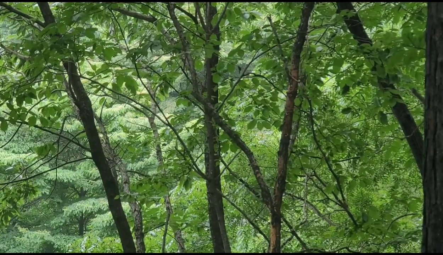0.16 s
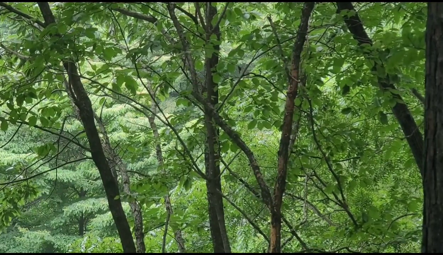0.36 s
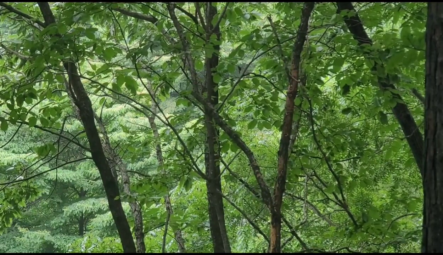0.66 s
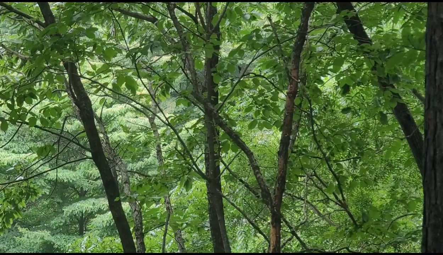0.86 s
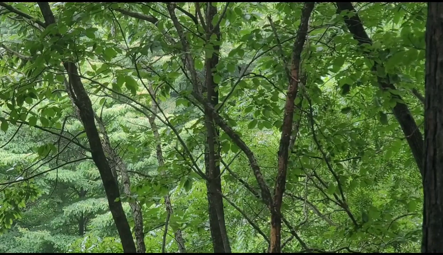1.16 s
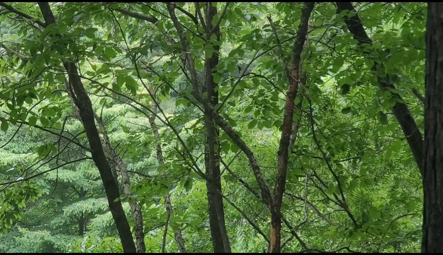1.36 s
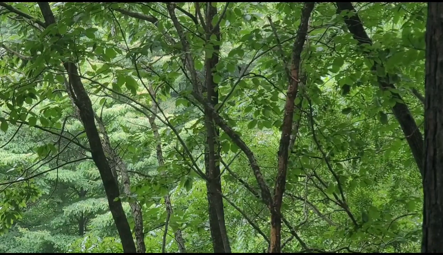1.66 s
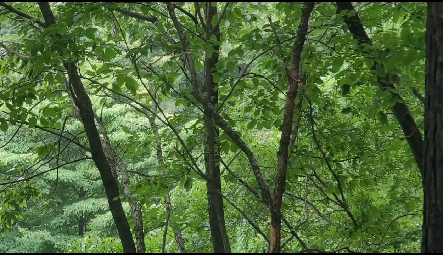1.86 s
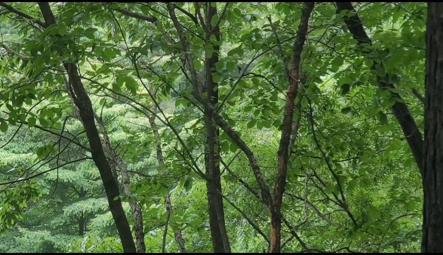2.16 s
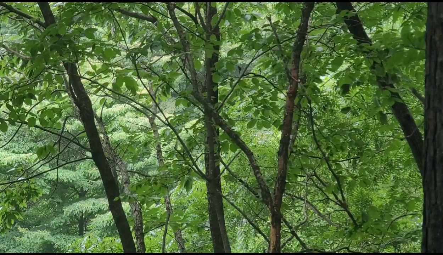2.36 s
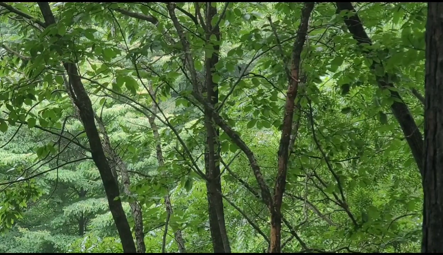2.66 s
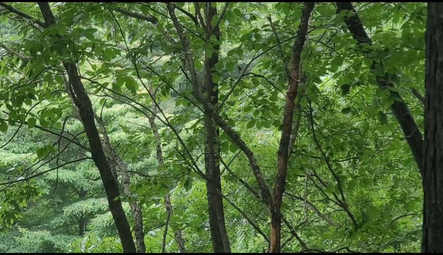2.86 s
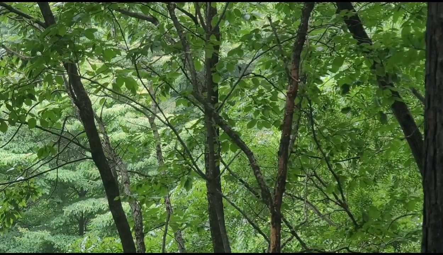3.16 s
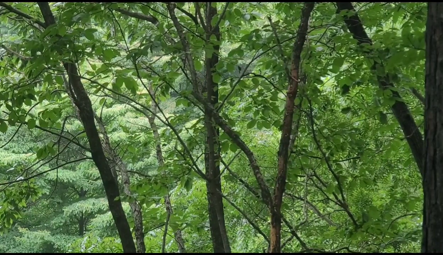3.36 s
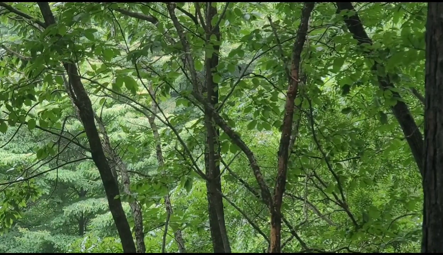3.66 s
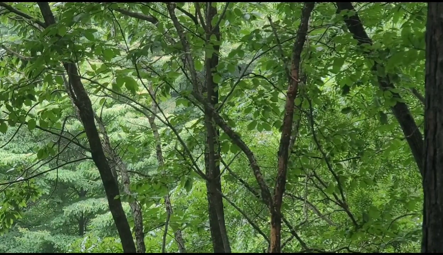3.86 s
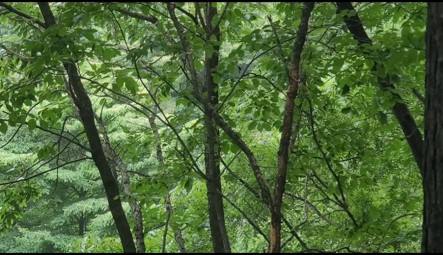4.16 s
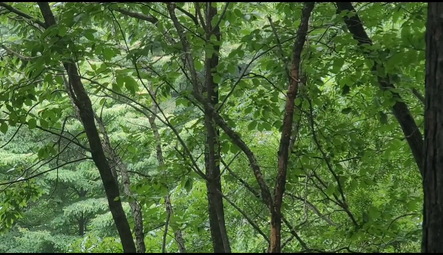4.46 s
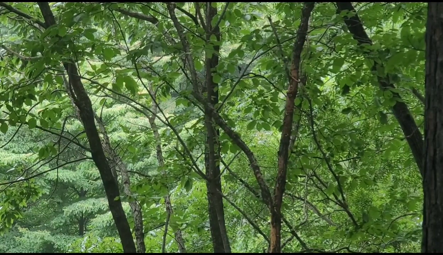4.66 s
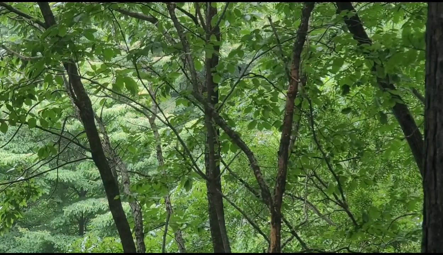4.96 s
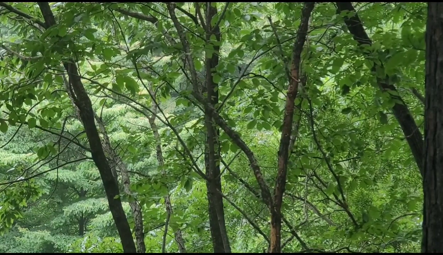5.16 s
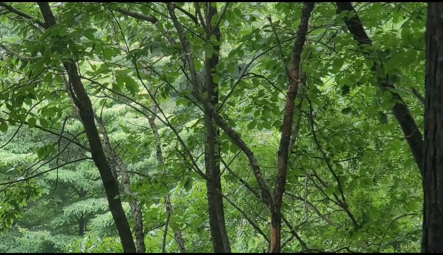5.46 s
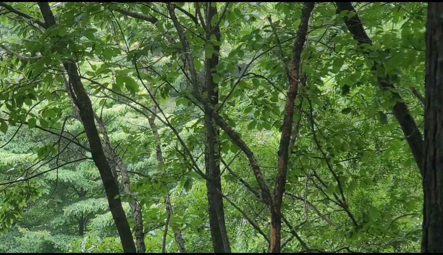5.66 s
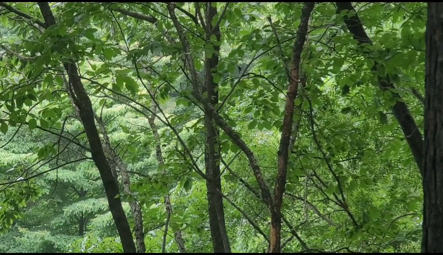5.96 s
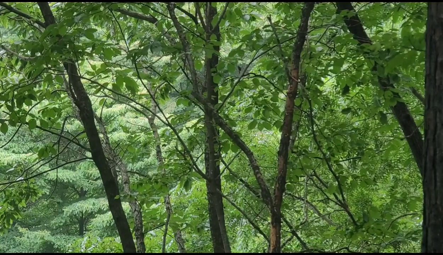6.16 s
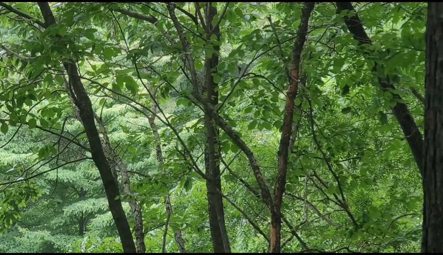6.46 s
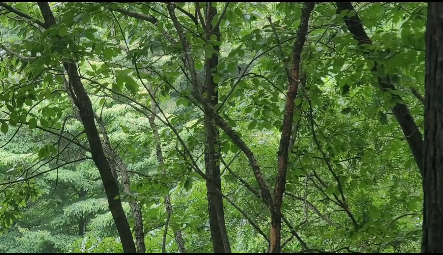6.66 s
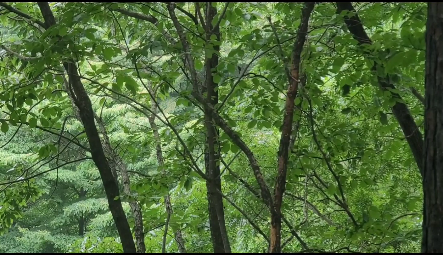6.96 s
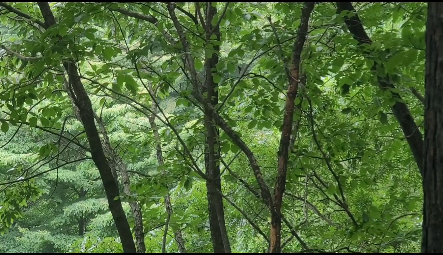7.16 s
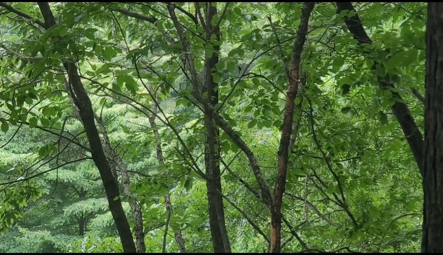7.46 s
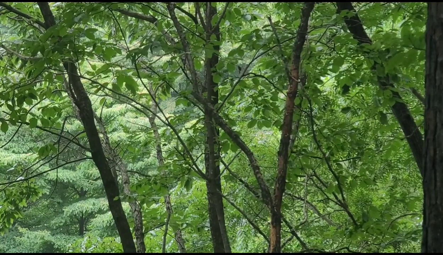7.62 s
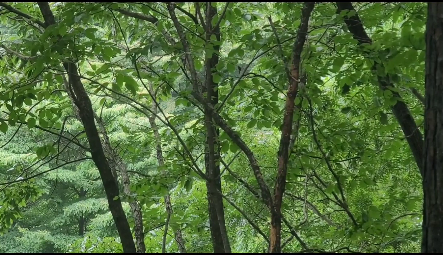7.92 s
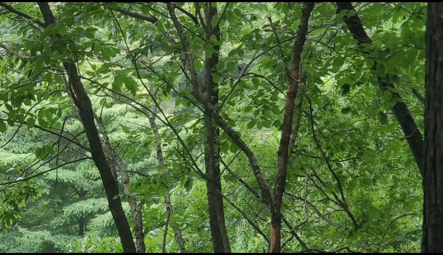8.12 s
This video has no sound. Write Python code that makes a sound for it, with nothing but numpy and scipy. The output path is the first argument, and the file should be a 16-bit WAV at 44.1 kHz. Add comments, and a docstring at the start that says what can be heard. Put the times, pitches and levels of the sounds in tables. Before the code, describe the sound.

Cicadas shrill steadily in a summer wood, with faint bird peeps, light leaf rustles and a few bumps on the microphone.

```python
"""Cicadas shrill in a summer wood: a far chorus near 8 kHz, a nearer group early, a low singer whose
click rate climbs as its pitch sinks, and two high cicadas late, one after the other, the second slower
and fainter. Trains of tymbal clicks ring their hollow abdomens; trunks and leaves scatter the song.
A far bird whistles and something peeps faintly. Close by, leaves rustle and tick, the microphone stand
is bumped, and something scrapes the housing at the end. A hush and a low air rumble lie under it all."""
import sys
import numpy as np
from scipy import signal
from scipy.fft import rfft, irfft
from scipy.io import wavfile
from scipy.ndimage import uniform_filter1d

SR = 44100
rng = np.random.default_rng(int(sys.argv[2]) if len(sys.argv) > 2 else 0)


def persist_wave(psi):
    """Save psi, clipped to +-1, as 16-bit WAV."""
    counts = np.round(np.clip(psi, -1, 1) * 32767).astype(np.int16)
    wavfile.write(sys.argv[1], SR, np.atleast_2d(counts).T)


N = 365588
T = np.arange(N) / SR

# Hush of the wood. Each row: frequency in Hz, relative density in dB.
AIR_SPECTRUM = [(100, -32), (140, -1), (216, -19), (300, -13.5), (400, -14.5), (700, -24), (1000, -23),
                (1500, -27), (2500, -12), (3340, -10.5), (4420, -20.5), (6000, -16.5), (9950, -37),
                (11100, -27), (13900, -35), (15500, -44)]
# Hush and leaf body. Each row: frequency in Hz, left-right coherence from 0 to 1.
COHERENCE = [(60, 0.35), (160, 0.92), (450, 0.69), (1000, 0.69), (2000, 0.038), (4000, 0.34)]
# Air rumble. Each row: time in seconds, level in dB.
RUMBLE_LEVEL = [(0, -49), (.2, -53.5), (1.2, -54), (2.1, -53), (2.3, -48.5), (2.8, -52.5), (3.2, -56.5),
                (3.8, -53), (4.3, -57), (6.5, -55), (7.2, -53), (7.6, -47.5), (7.8, -52), (8.06, -46),
                (8.29, -67)]
# Far peeps. Each row: start in seconds, length in seconds, pitch in Hz, level in dB, hoarseness 0 to 1.
PEEPS = [(0.663, 0.1, 3370, -57, 0.5), (0.78, 0.092, 3390, -46.5, 0.2), (0.898, .13, 3380, -54, 0.6),
         (1.192, 0.15, 3340, -49, 0.2), (1.67, 0.085, 3390, -58, .5), (2.635, 0.081, 3370, -57, 0.35),
         (2.798, .04, 3390, -57, .5), (2.862, 0.088, 3330, -49, .45), (2.952, 0.08, 3370, -46, 0.4),
         (3.035, .04, 3500, -51, .7), (3.597, 0.2, 3380, -57, 0.6), (4.488, 0.2, 3330, -51.5, .3),
         (4.702, 0.12, 3357, -55, 0.67), (4.86, 0.07, 3370, -48.5, .8), (4.945, 0.13, 3380, -56, 0.4),
         (5.548, 0.14, 3380, -62, 0.4), (6.075, 0.1, 3376, -60, 0.1), (6.374, 0.25, 3363, -55.5, 0.88),
         (6.647, 0.077, 3370, -53, .7), (6.732, 0.057, 3330, -51, 0.6), (6.788, 0.11, 3446, -50.5, 0.15),
         (7.644, 0.06, 3410, -49.5, 0.6), (7.712, 0.069, 3330, -45, 0.5), (7.788, 0.073, 3380, -57, 0.7),
         (8.076, 0.12, 3420, -56, 0.4)]
# Bird whistles. Each row: start in seconds, length in seconds, first and last pitch in Hz, level in dB,
# slur time in seconds, fade in dB per second.
BIRD_NOTES = [(1.415, .18, 3950, 4250, -48.5, .035, 70), (7.984, .075, 3850, 4300, -47, .034, 330),
              (8.074, .045, 4000, 4560, -47, .03, 300)]
# Dull body of a rustle. Each row: frequency in Hz, relative density in dB.
LEAF_SPECTRUM = [(200, -7), (350, -0.5), (650, 1.5), (1000, -5.5), (1700, -4), (2300, -10), (3500, -12.5)]
# Leaf rustles. Each row: peak time in seconds, length in seconds, fizz, body and crackle levels in dB.
RUSTLES = [(.68, 0.31, -48.5, -75, -54.5), (.8, 0.027, -58, -48, -53), (1.23, 0.07, -40, -63, -47.5),
           (1.29, 0.087, -43, -54.5, -53), (1.642, 0.027, -53, -41.5, -43), (1.73, 0.34, -44.5, -59.5, -52),
           (1.911, 0.033, -44, -49, -44), (1.97, 0.092, -43.5, -52, -47.5), (2.05, 0.057, -49, -44, -67),
           (2.122, 0.039, -63, -47.5, -46.5), (2.38, 0.2, -53, -52.5, -56), (2.6, 0.13, -54, -57, -59),
           (2.885, 0.02, -58, -49, -50), (3.92, 0.044, -62, -50.5, -72), (4.66, 0.21, -48.5, -54, -51.5),
           (4.742, 0.029, -44, -44.5, -42), (5.06, 0.12, -48, -60, -52), (6.53, 0.17, -56, -54.5, -59),
           (6.89, 0.031, -63, -52, -60), (7.52, 0.15, -52, -49.5, -51.5), (7.651, 0.013, -51, -36.5, -60),
           (7.7, 0.072, -50, -64, -49.5), (8.08, 0.029, -59, -47, -63), (8.135, 0.045, -47, -52, -45.5),
           (8.175, 0.045, -57, -36.5, -43), (8.21, 0.12, -50, -42.5, -45.5)]
# Close ticks. Each row: start in seconds, knock level in dB, knock pitch in Hz, snap and fizz gains in dB,
# left over right in dB.
TICKS = [(0.78, -40, 556, -43, -47, 1.5), (1.215, -41, 554, -30, -26, 8), (1.314, -42, 580, -48, -43, 9),
         (1.625, -36, 570, -27, -47, 11.5), (1.641, -31, 577, -37, -42, 2),
         (1.708, -46.5, 550, -43, -30, 13), (1.902, -62, 1610, -35, -42, 13),
         (1.905, -62, 1610, -30.5, -44, 17), (1.929, -40, 444, -42, -46, -2.5),
         (1.967, -49, 340, -38, -48, 5), (2.04, -35.5, 403, -30, -38, -2), (2.121, -39.5, 330, -40, -55, 1),
         (2.342, -36.5, 345, -48, -51, 1.5), (2.41, -42, 376, -31, -45, 2), (2.883, -36, 600, -36, -51, 3),
         (4.717, -40.5, 382, -48, -49, -7), (4.736, -43, 630, -36, -25, 10),
         (4.747, -59, 575, -29, -32, 11), (5.032, -43, 352, -26, -49, 3), (6.886, -45, 657, -35, -52, 0),
         (7.527, -51, 390, -25, -49, .6), (7.647, -29, 455, -17, -13, 2), (7.650, -33.5, 417, -28, -21, 4),
         (8.071, -39, 494, -34, -49, 0), (8.11, -41, 417, -24, -46, 3), (8.164, -22.5, 1058, -41, -47, 0),
         (8.176, -10, 1310, -23, -48, -1), (8.182, -27, 930, -27, -43, 7), (8.236, -37, 287, -40, -52, 2.5),
         (8.27, -32, 1860, -38, -50, -13)]
# Stand bumps. Each row: peak time in seconds, length in seconds, peak level in dB, wobble in Hz.
BUMPS = [(2.077, 0.046, -20, 94.2), (2.081, .07, -41, 174), (2.113, 0.053, -29, 107),
         (2.17, 0.077, -28.5, 55.5), (2.38, 0.073, -39.5, 97), (2.433, 0.076, -36, 67),
         (2.526, 0.067, -42, 62.3)]
# Rub on the housing. Each row: time in seconds, push level in dB, grit level in dB.
SCRAPE_LEVELS = [(8.13, -61, -44), (8.148, -40, -52), (8.178, -29.5, -28.5), (8.226, -50, -44),
                 (8.254, -48, -49), (8.29, -65, -53)]
# Colour of the far chorus. Each row: frequency in Hz, relative gain in dB.
CHORUS_SPECTRUM = [(3060, -50), (5200, -5.5), (5990, -4), (7190, 1), (7940, 3.5), (8470, 3), (9350, -8),
                   (9510, -42), (10200, -39), (13300, -53), (22000, -120)]
# Chorus balance. Each row: frequency in Hz, left over right in dB.
CHORUS_PAN = [(5200, 6.5), (6500, -4), (7300, -2), (8200, 6.5), (9000, -1), (10000, -6)]
# Chorus swell. Each row: time in seconds, level in dB.
CHORUS_LEVEL = [(0, -40.5), (.7, -42.5), (1.7, -40.5), (2.5, -40), (3.4, -41.5), (4.6, -40.5), (5.1, -41),
                (5.9, -38.5), (6.4, -40.5), (8.3, -39)]
# Drone swell. Each row: time in seconds, gain in dB.
DRONE_GAIN = [(0, -54), (2, -53), (3.6, -48), (5, -48), (5.6, -50), (6.4, -46), (7, -48), (8.3, -50)]
# Drone partials. Each row: frequency in Hz, offset from the drone gain in dB.
DRONE_PARTIALS = [(7958, -2), (8205, -7), (8370, -5), (8674, -8)]
# Nearer cicadas. Each row: time in seconds, tymbal clicks per second, level in dB, body resonance in Hz.
LOW_SINGER = [(0, 286, -50, 7160), (1.05, 296, -50.5, 7000), (2.25, 307.2, -50, 6720),
              (3.1, 316.2, -48.5, 6380), (3.6, 321, -45.5, 6150), (4.05, 324.4, -46.5, 6130),
              (4.65, 327.4, -46.5, 6020), (5.3, 330.3, -46, 5930), (5.7, 331.6, -47, 5890),
              (6.09, 332.3, -52, 5900), (6.14, 332.3, -80, 5850)]
EARLY_GROUP = [(0, 291, -51.5, 8800), (1, 297.4, -46.5, 8900), (2, 302, -49.5, 8850), (3, 308, -52, 8750),
               (3.7, 310, -66, 8610)]
LATE_SINGERS = [(6.4, 275, -80, 9020), (6.6, 281.7, -49, 8980), (7.25, 282.3, -52, 8940),
                (7.3, 280, -75, 8950), (7.4, 260, -75, 9050), (7.5, 259.4, -57, 9400),
                (8.3, 260, -61, 9000)]  # two in turn, the second slower and fainter

RIGHT_LAG_S = .00042  # low sounds reach the left microphone first
FLUTTER_HZ, FLUTTER_DEPTH, FLUTTER_SWING_RAD = 74, .6, .6


def gain_of(db):
    return 10 ** (np.asarray(db) / 20)


def unit_rms(x):
    return x / np.sqrt(np.mean(x ** 2) + 1e-20)


def at_hz(rows, hz):
    row_hz, values = np.transpose(rows)
    return np.interp(np.log(hz + 1), np.log(row_hz + 1), values)


def curves(rows):
    """A gate open while the table lasts, then each column at every sample."""
    times_s, *columns = np.transpose(rows)
    inside_s = np.minimum(T - times_s[0], times_s[-1] - T)
    open_at_start = times_s[0] <= 0
    open_at_end = (times_s[-1] > T[-1] - .01) * (T > times_s.mean())
    gate = np.clip(inside_s / .006 + open_at_start + open_at_end, 0, 1)
    return gate, *(np.interp(T, times_s, column) for column in columns)


def drift(per_s):
    """Straight lines between unit Gaussian draws."""
    count = int(N / SR * per_s) + 2
    return np.interp(T, np.linspace(0, T[-1], count), rng.standard_normal(count))


def trapezoid(start_s, length_s, edge_s):
    edge_s = np.clip(edge_s, .002, length_s / 2)
    end_s = start_s + length_s
    return np.interp(T, [start_s, start_s + edge_s, end_s - edge_s, end_s], [0, 1, 1, 0])


def band(x, lo_hz, hi_hz):
    return signal.sosfilt(signal.butter(2, [lo_hz, hi_hz], "bandpass", fs=SR, output="sos"), x)


def resonate(x, hz, width_hz):
    """Moving resonance: shift hz to zero, smooth twice, shift back."""
    carrier = np.exp(2j * np.pi * np.cumsum(hz) / SR)
    pole = np.exp(-np.pi * width_hz / SR)
    return 2 * (carrier * signal.lfilter([(1 - pole) ** 2], [1, -2 * pole, pole ** 2], x / carrier)).real


def moving_band(x, hz, span_hz):
    """Steep, flat-topped band centred on the curve hz."""
    carrier = np.exp(2j * np.pi * np.cumsum(hz) / SR)
    return 2 * (carrier * signal.sosfilt(signal.butter(4, span_hz / SR, output="sos"), x / carrier)).real


def near(x, pan_db=0., lag_s=RIGHT_LAG_S):
    """A close sound on the microphone pair; positive pan is left."""
    late = np.r_[np.zeros(round(lag_s * SR)), x][:len(x)]
    return np.array([x * gain_of(pan_db / 2), late * gain_of(-pan_db / 2)])


def wood(x, t60_s):
    """Trunks and leaves scatter sound into dying echoes, different at each microphone."""
    size = SR // 2
    echoes = rng.standard_normal((2, size)) * (rng.random((2, size)) < .06)
    echoes *= gain_of(-60 * T[:size] / t60_s)
    echoes /= np.linalg.norm(echoes, axis=1)[:, None]
    return signal.oaconvolve(x[None], echoes, axes=1)[:, :N]


def far_tone(level, hz, waver_hz, t60_s):
    """A wavering tone, part direct, part scattered by the wood."""
    tone = level * np.sin(2 * np.pi * np.cumsum(hz + waver_hz * drift(70)) / SR)
    return .72 * tone + .7 * wood(tone, t60_s)


def patchy_noise(spectrum, patch_db):
    """Coloured noise with drifting spectral patches, partly coherent between microphones."""
    frames, hz = N // 256 + 5, np.fft.rfftfreq(1024, 1 / SR)
    left_re, left_im, own_re, own_im, patches = rng.standard_normal((frames, 513, 5)).T
    patches = unit_rms(uniform_filter1d(uniform_filter1d(patches, size=12, axis=0), size=12, axis=1))
    coherence = at_hz(COHERENCE, hz)[:, None]
    delay = np.exp(-2j * np.pi * hz * RIGHT_LAG_S)[:, None]
    left = left_re + 1j * left_im
    right = coherence * delay * left + np.sqrt(1 - coherence ** 2) * (own_re + 1j * own_im)
    spectra = np.array([left, right]) * gain_of(at_hz(spectrum, hz)[:, None] + patch_db * patches)
    return unit_rms(signal.istft(spectra, nperseg=1024, noverlap=768)[1][:, :N])


def air(hush_db=-52):
    """Steady hush over a low rumble that swells in lumps."""
    common, own = rng.standard_normal(N), rng.standard_normal((2, N))
    rumble = unit_rms(band(band(near(common) + .32 * own, 50, 90.2), 11, 194))
    rumble *= gain_of(curves(RUMBLE_LEVEL)[1] + 1.3 * drift(5.4))
    return gain_of(hush_db) * patchy_noise(AIR_SPECTRUM, patch_db=2) + rumble


def peeping(murmur_db=-62, throb_db=2.5, buzz_hz=137, buzz_depth=.4):
    """Far, throbbing peeps over a faint murmur: a buzzing tone, partly broken into breathy noise."""
    starts_s, _, pitches_hz, _, hoarseness = np.transpose(PEEPS)
    hz, hoarse = np.interp(T, starts_s, pitches_hz), np.interp(T, starts_s, hoarseness)
    peeps = sum(gain_of(db) * trapezoid(start_s, length_s, edge_s=.008)
                for start_s, length_s, _, db, _ in PEEPS)
    level = (gain_of(murmur_db) + peeps) * unit_rms(gain_of(throb_db * drift(25)))
    breath = unit_rms(resonate(rng.standard_normal((2, N)), hz, width_hz=300))
    buzz = 1 + buzz_depth * np.cos(2 * np.pi * np.cumsum(buzz_hz * (1 + .064 * drift(5.8))) / SR)
    tone = far_tone(np.sqrt(1 - hoarse) * level * buzz, hz, waver_hz=50, t60_s=.06)
    return tone + .7 * np.sqrt(hoarse) * level * breath


def bird(tremble_db=2.5):
    """Far, husky whistles slur up to a held note that trembles and fades."""
    level, pitch_points = np.zeros(N), []
    for start_s, length_s, first_hz, last_hz, db, slur_s, fade_db_per_s in BIRD_NOTES:
        held_s = np.clip(T - start_s - slur_s, 0, 1)
        level += gain_of(db - fade_db_per_s * held_s) * trapezoid(start_s, length_s, edge_s=.016)
        pitch_points += [(start_s, first_hz), (start_s + slur_s, last_hz),
                         (start_s + length_s + .001, last_hz)]
    level *= unit_rms(gain_of(tremble_db * drift(70)))
    hz = np.interp(T, *np.transpose(pitch_points))
    husk = .65 * level * unit_rms(resonate(rng.standard_normal((2, N)), hz, width_hz=400))
    return far_tone(level, hz, waver_hz=60, t60_s=.04) + husk


def rustle(rest_fizz_db=-50.5, rest_body_db=-57.5, rest_crackle_db=-73):
    """Leaves rub in many tiny contacts: fizz, dull body and crackle swell above a constant stir."""
    power = gain_of([rest_fizz_db, rest_body_db, rest_crackle_db])[:, None] ** 2 * np.ones(N)
    for peak_s, length_s, *levels_db in RUSTLES:
        steepness = np.where(T < peak_s, 3.2, 2.2)
        power += gain_of(levels_db)[:, None] ** 2 * np.exp(-(steepness * (T - peak_s) / length_s) ** 2)
    waver_db = 1.04 * np.array([drift(12), drift(12), drift(10)])
    fizz_level, body_level, crackle_level = np.sqrt(power) * gain_of(waver_db)
    grain = gain_of(1.53 * np.repeat(rng.standard_normal(N // 128 + 1), 128)[:N])
    fizz = unit_rms(band(rng.standard_normal((2, N)) * grain ** 1.05, 4030, 12900))
    crackle = unit_rms(band(rng.standard_normal((2, N)) * grain, 2140, 5400))
    body = unit_rms(patchy_noise(LEAF_SPECTRUM, patch_db=2.5) * grain)
    return fizz_level * fizz + crackle_level * crackle + body_level * body


def ticks(release_s=.0021, ring_db=17, crack_t60_s=.0035, tail_t60_s=.035, knock_t60_cycles=12):
    """A contact loads up and breaks: a hollow knock, plus a noise burst as snap, ring and fizz."""
    out, size = np.zeros((2, N)), 4096
    bursts = rng.standard_normal((len(TICKS), size))
    bursts[:, round(release_s * SR)] += 4  # the break is one sharp kick
    loading = np.minimum(T[:size] / .0023, 1) ** 6
    after_s = np.maximum(T[:size] - release_s, 0)
    decay = gain_of(-60 * after_s / crack_t60_s) + .18 * gain_of(-60 * after_s / tail_t60_s)
    for (start_s, knock_db, knock_hz, snap_db, fizz_db, pan_db), burst in zip(TICKS, bursts):
        cycles = knock_hz * after_s
        knock = gain_of(knock_db - 60 * cycles / knock_t60_cycles) * np.cos(2 * np.pi * cycles)
        ring = gain_of(ring_db) * band(burst, 5930, 6290)
        snap = gain_of(snap_db) * (.85 * band(burst, 1250, 3300) + ring)
        fizz = gain_of(fizz_db) * band(burst, 11000, 21000)
        tick = near(loading * (knock + (snap + fizz) * decay), pan_db, lag_s=.00025)
        first = round(start_s * SR)
        out[:, first:first + size] += tick[:, :N - first]
    return out


def stand_bumps():
    """The stand wobbles: a few low cycles swell and die with each bump."""
    out = np.zeros(N)
    for peak_s, length_s, db, hz in BUMPS:
        swell = np.cos(np.pi * np.clip((T - peak_s) / length_s, -.5, .5))
        out += gain_of(db) * swell * np.cos(2 * np.pi * hz * (T - peak_s))
    return near(out)


def scrape(slips_per_s=2500):
    """A rub against the housing: a low push and coarse grit."""
    gate, push_db, grit_db = curves(SCRAPE_LEVELS)
    slips = rng.standard_normal(N) * (rng.random(N) < slips_per_s / SR)
    push = gain_of(push_db) * unit_rms(band(band(rng.standard_normal(N), 56, 143), 40, 190))
    grit = gain_of(grit_db) * unit_rms(band(slips, 330, 1560))
    return near(gate * (push + grit), pan_db=.98, lag_s=.00012)


def tymbal_clicks(per_s, waver):
    """An even train of sharp clicks, 36 equal harmonics, with a slightly wavering rate."""
    half_phase = np.pi * (np.cumsum(per_s * (1 + waver * drift(75))) / SR + rng.random())
    return np.sin(73 * half_phase) / (np.sin(half_phase) + 1e-12) - 1


def flutter_phase():
    """Phase of one insect's quick flutter, in radians."""
    return 2 * np.pi * (np.cumsum(FLUTTER_HZ * (1 + .07 * drift(8))) / SR + rng.random())


def bunched_clicks(per_s, waver, fade_db=5, wander_rad=1.2):
    """Tymbal clicks in quick bunches; moving air fades and shifts each partial separately."""
    phase = 2 * np.pi * np.cumsum(per_s * (1 + waver * drift(75))) / SR
    flutter = flutter_phase()
    swing_rad = -FLUTTER_SWING_RAD * np.sin(flutter)
    partials = sum(gain_of(fade_db * drift(30)) * np.cos(k * phase + swing_rad + wander_rad * drift(25))
                   for k in range(15, 28))
    return (1 + FLUTTER_DEPTH * np.cos(flutter)) * partials


def chorus(count=13):
    """Far cicadas, each with its own body pitch, creeping click rate and swell, blurred by the wood."""
    hz = np.fft.rfftfreq(N, 1 / SR)
    spectrum = .48 * rfft(rng.standard_normal((2, N)))  # the farthest merge into hiss
    for k, (start, climb) in enumerate(rng.random((count, 2))):
        per_s = (258 + 80 * start + 3 * climb * T) * (1 + .002 * drift(2))
        swell = gain_of(2.8 * drift(.8) + 3.65 * drift(9))
        body_hz = 6500 + 3000 * k / (count - 1)
        body = np.exp(-((hz - body_hz) / 1000) ** 2)
        clicks = unit_rms(swell * tymbal_clicks(per_s, waver=.003))
        spectrum += .4 * body * rfft(wood(clicks, t60_s=.3))
    pan_db = at_hz(CHORUS_PAN, hz)
    spectrum *= gain_of(at_hz(CHORUS_SPECTRUM, hz) + np.array([pan_db, -pan_db]) / 2)
    return gain_of(curves(CHORUS_LEVEL)[1]) * unit_rms(irfft(spectrum, N))


def drone(fade_db=4.5, pan_db=6):
    """Thin partials stand out of the chorus, flutter, and come and go."""
    swell_db = curves(DRONE_GAIN)[1]
    out = np.zeros((2, N))
    for hz, offset_db in DRONE_PARTIALS:
        level = gain_of(swell_db + offset_db + fade_db * drift(12))
        level *= 1 + FLUTTER_DEPTH * np.cos(flutter_phase())
        out += far_tone(level, hz, waver_hz=26, t60_s=.19)
    return out * gain_of([[pan_db / 2], [-pan_db / 2]])


def cicada(rows, width_hz, span_hz, rasp, throb_db, pan_db, direct_share,
           rate_ratios=(1,), train=tymbal_clicks, waver=.0052):
    """Clicks and rasp ring the hollow abdomen, whose pitch slides. One click train per rate ratio."""
    gate, per_s, level_db, body_hz = curves(rows)
    clicks = unit_rms(sum(train(per_s * ratio, waver) for ratio in rate_ratios))
    drive = clicks + rasp * rng.standard_normal(N)
    abdomen = unit_rms(moving_band(resonate(drive, body_hz, width_hz), body_hz, span_hz))
    throb = unit_rms(gain_of(throb_db * drift(35) + .9 * drift(7)))
    song = gate * gain_of(level_db) * throb * abdomen
    heard = np.sqrt(direct_share) * song + np.sqrt(1 - direct_share) * wood(song, t60_s=.2)
    return heard * gain_of([[pan_db / 2], [-pan_db / 2]])


def scene():
    """Cicadas, far calls, air and close noises, in stereo."""
    low = cicada(LOW_SINGER, width_hz=2600, span_hz=980, rasp=.35, throb_db=2, pan_db=-2.5,
                 direct_share=.65, train=bunched_clicks, waver=.002)
    late = cicada(LATE_SINGERS, width_hz=900, span_hz=900, rasp=.18, throb_db=5.5, pan_db=-2,
                  direct_share=.085)
    early = cicada(EARLY_GROUP, width_hz=1400, span_hz=1210, rasp=.99, throb_db=3, pan_db=3,
                   direct_share=.15, rate_ratios=(1.2, 1, .87, 1.04, .58))
    cicadas = low + late + early + drone() + chorus()
    return cicadas + peeping() + bird() + air() + rustle() + ticks() + stand_bumps() + scrape()


def record(dry):
    """The recorder's band limit: a steep low-pass."""
    cutoff_hz = 15700
    lowpass = signal.firwin(255, cutoff_hz, window=("kaiser", 9), fs=SR)
    return signal.oaconvolve(dry, lowpass[None], "same", axes=1)


dry = scene()
out = record(dry)
persist_wave(out)
```